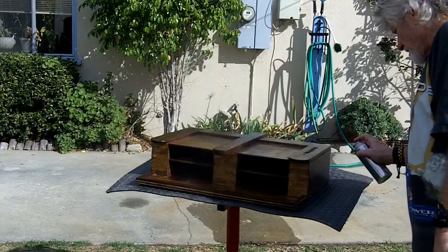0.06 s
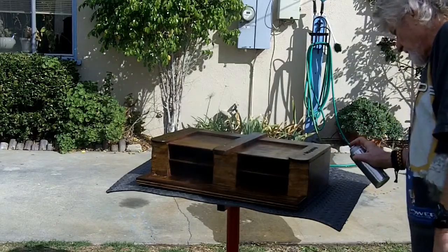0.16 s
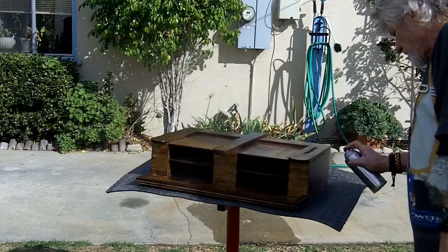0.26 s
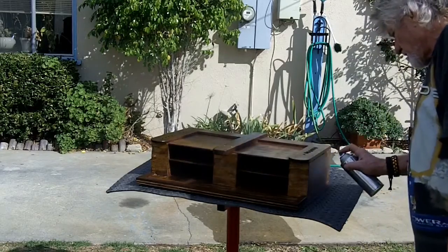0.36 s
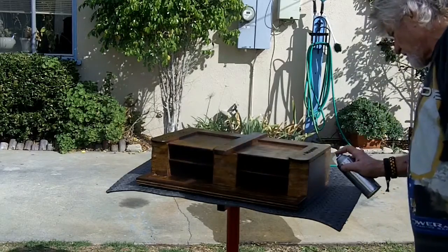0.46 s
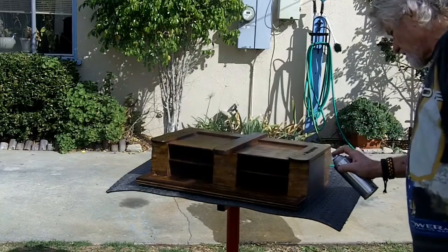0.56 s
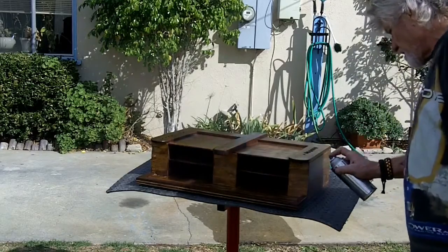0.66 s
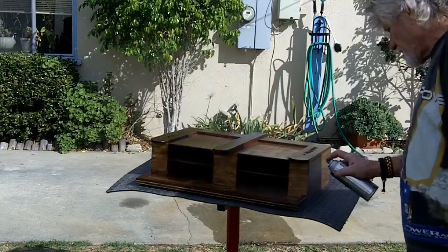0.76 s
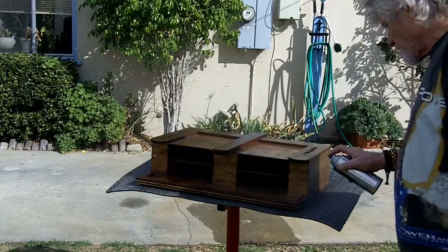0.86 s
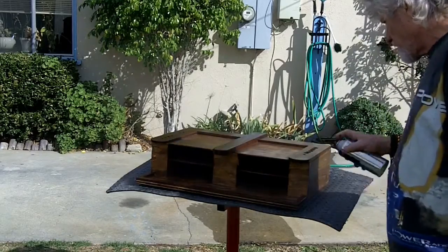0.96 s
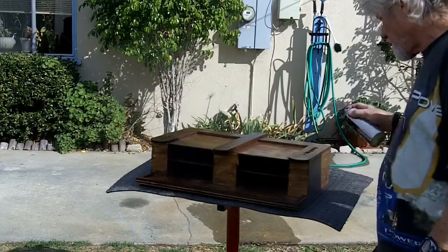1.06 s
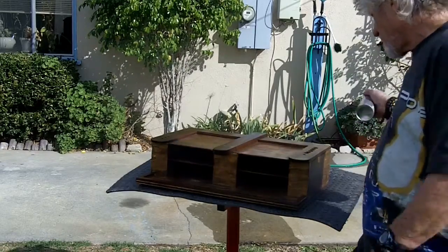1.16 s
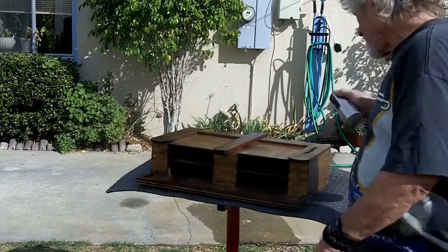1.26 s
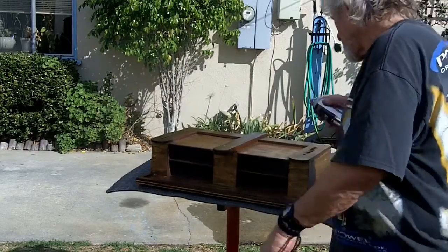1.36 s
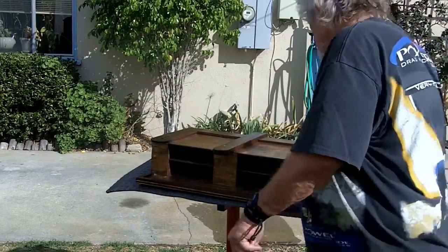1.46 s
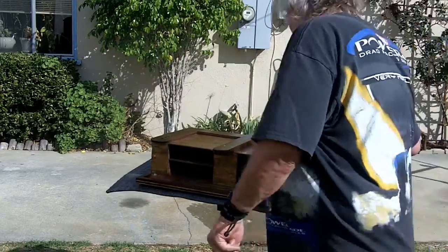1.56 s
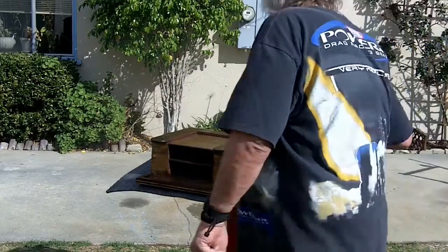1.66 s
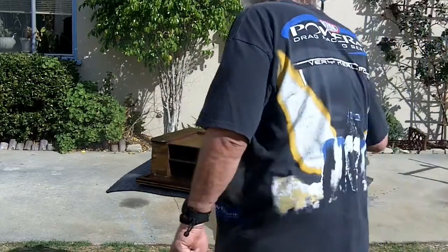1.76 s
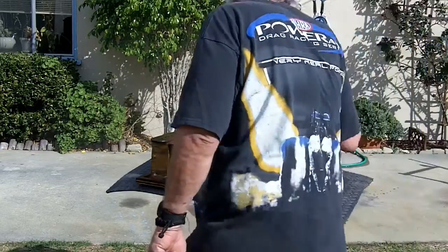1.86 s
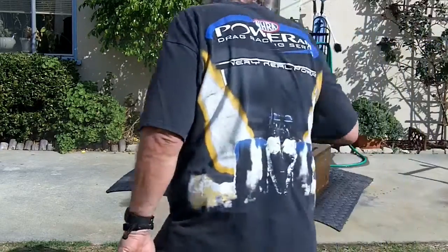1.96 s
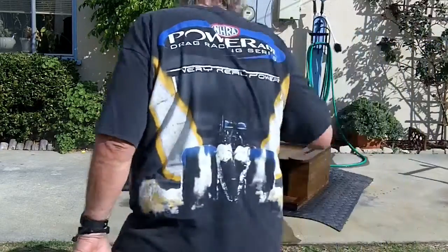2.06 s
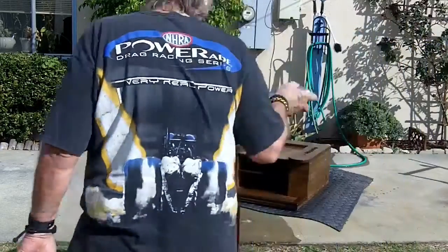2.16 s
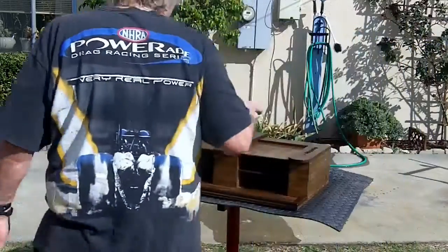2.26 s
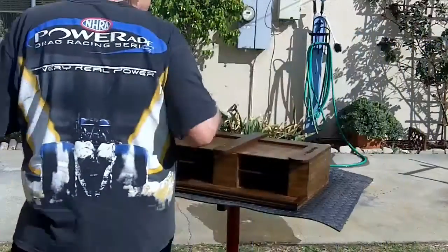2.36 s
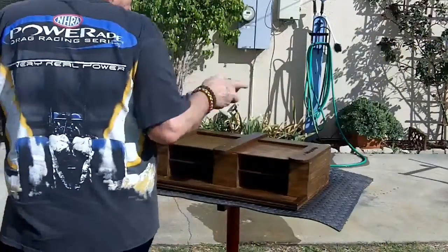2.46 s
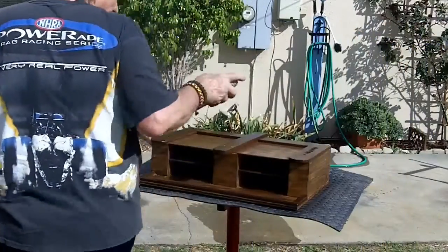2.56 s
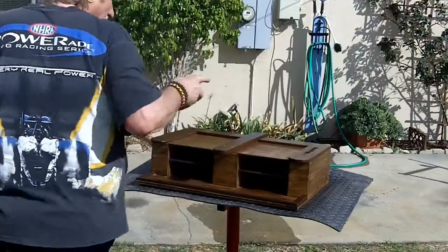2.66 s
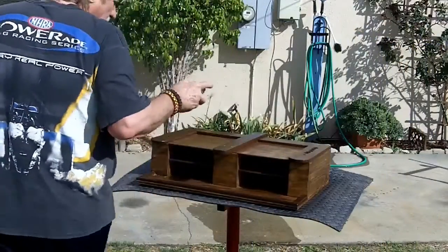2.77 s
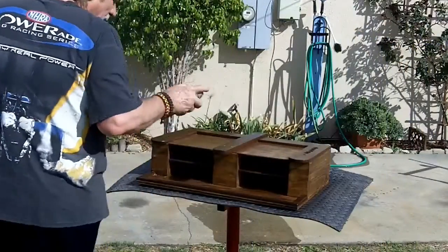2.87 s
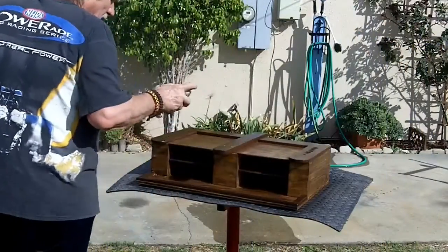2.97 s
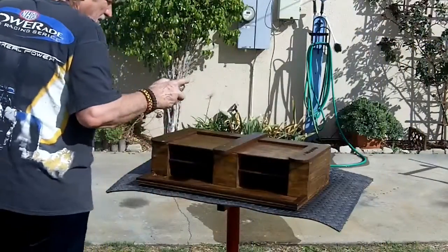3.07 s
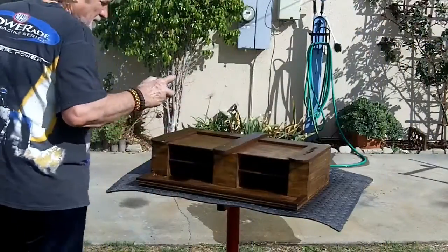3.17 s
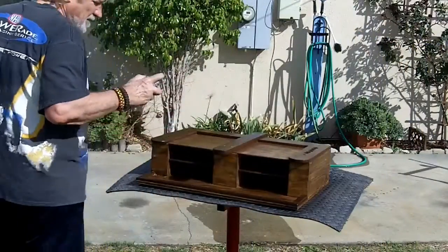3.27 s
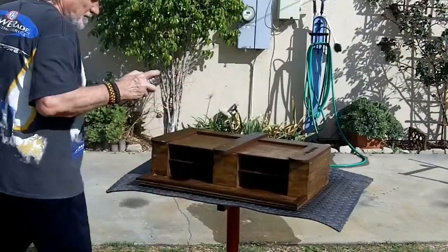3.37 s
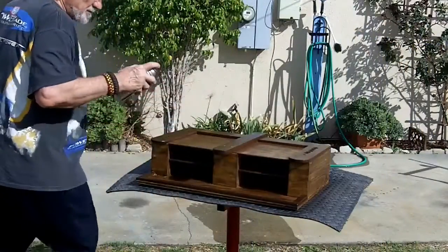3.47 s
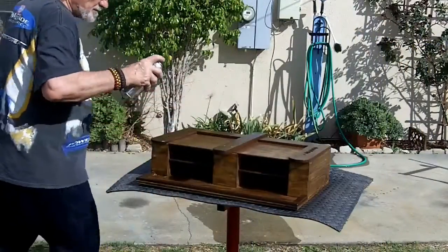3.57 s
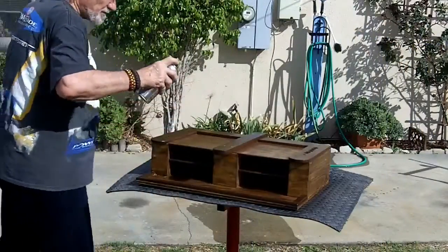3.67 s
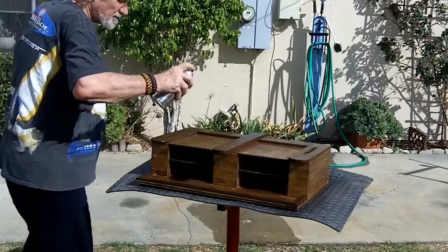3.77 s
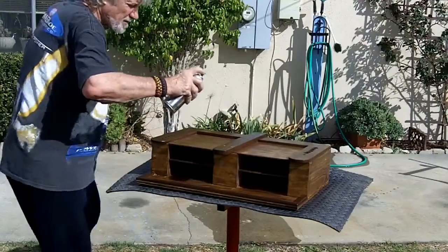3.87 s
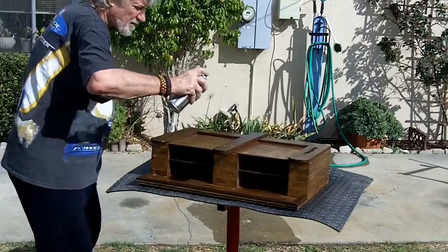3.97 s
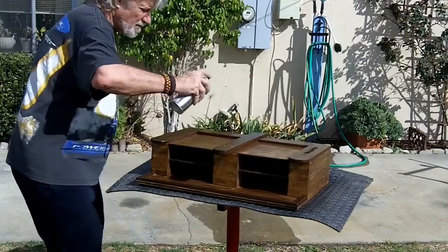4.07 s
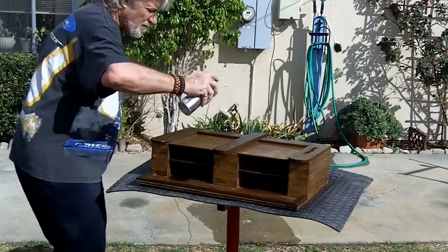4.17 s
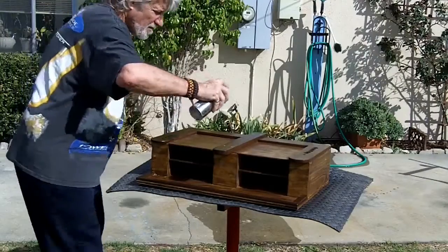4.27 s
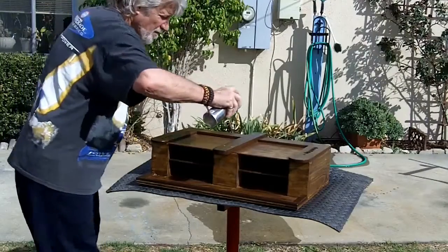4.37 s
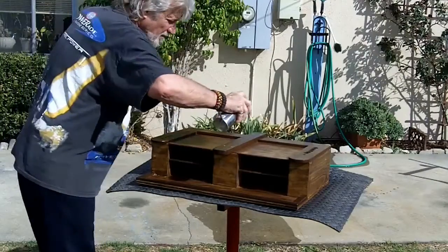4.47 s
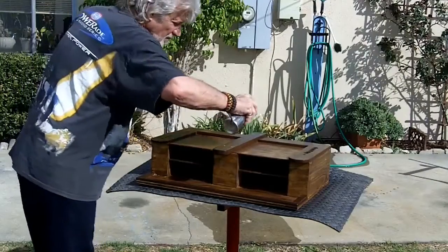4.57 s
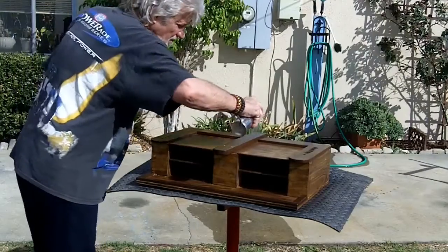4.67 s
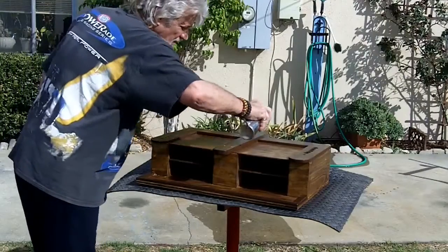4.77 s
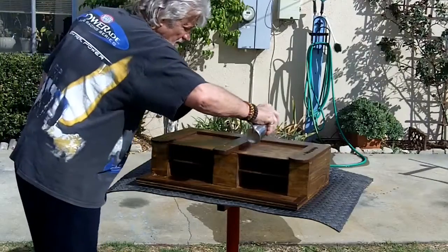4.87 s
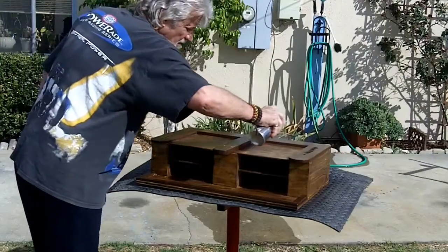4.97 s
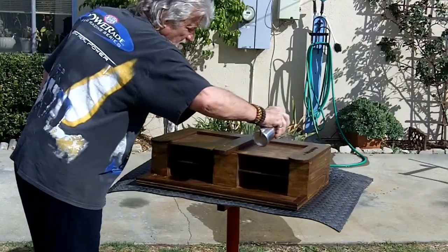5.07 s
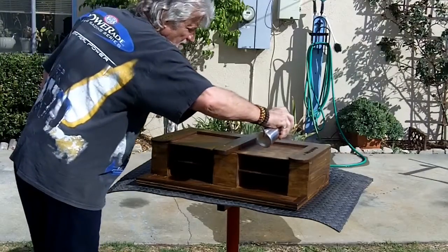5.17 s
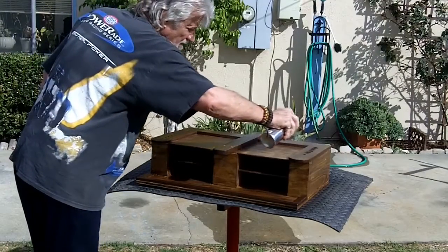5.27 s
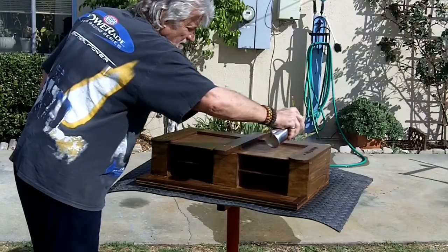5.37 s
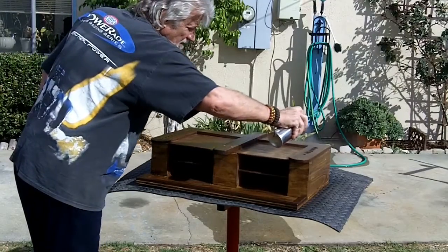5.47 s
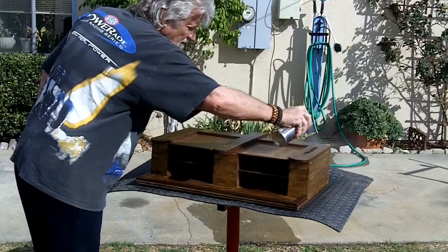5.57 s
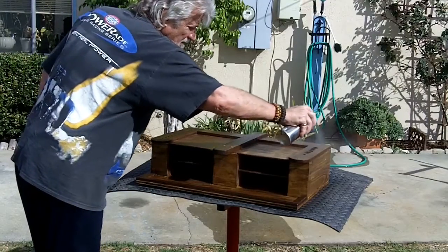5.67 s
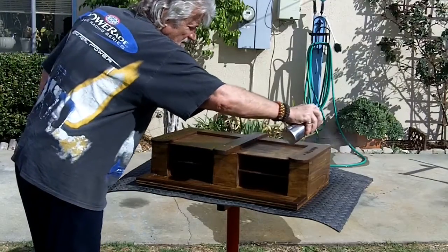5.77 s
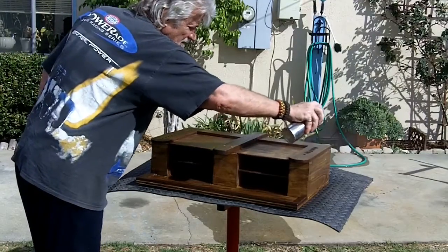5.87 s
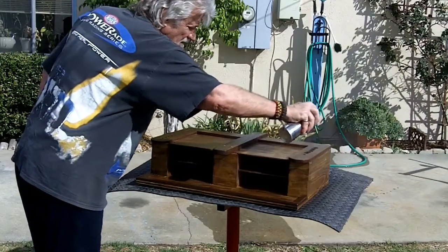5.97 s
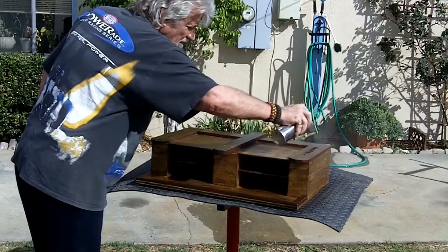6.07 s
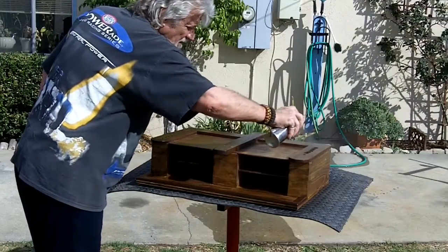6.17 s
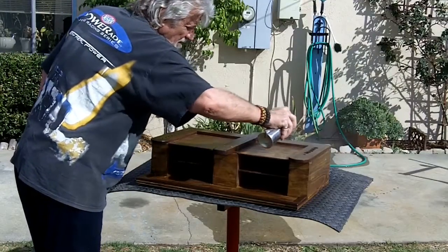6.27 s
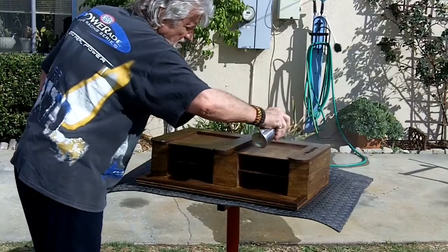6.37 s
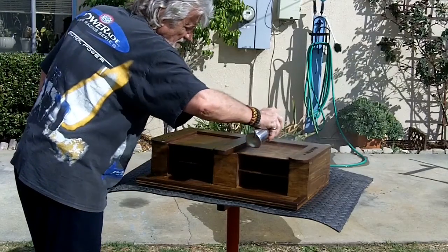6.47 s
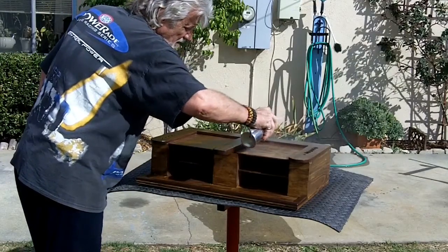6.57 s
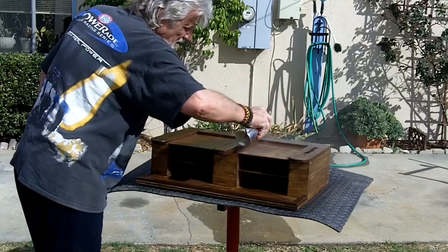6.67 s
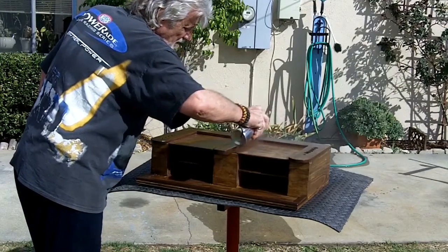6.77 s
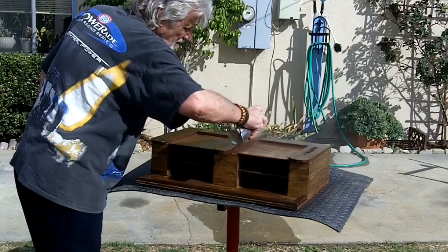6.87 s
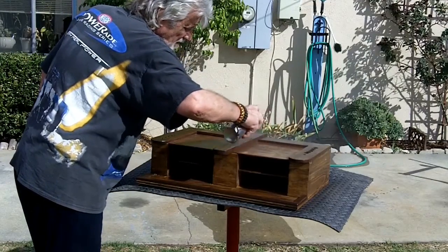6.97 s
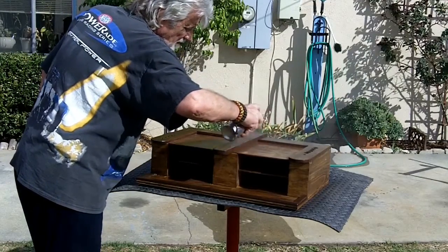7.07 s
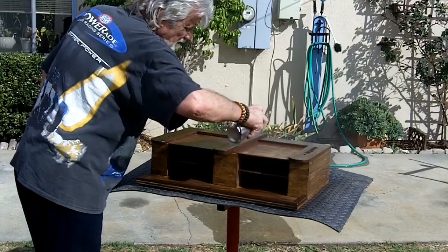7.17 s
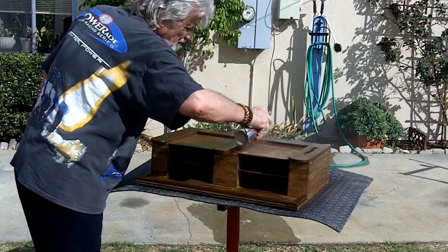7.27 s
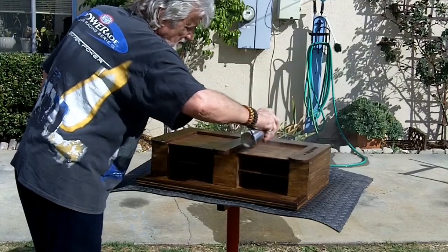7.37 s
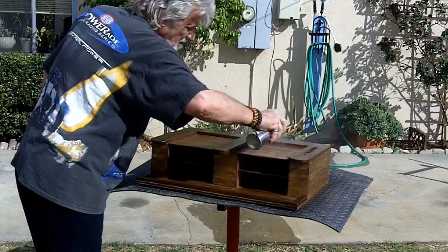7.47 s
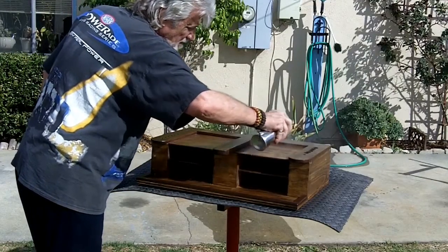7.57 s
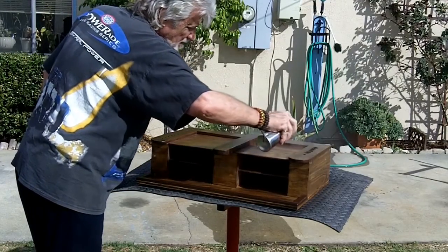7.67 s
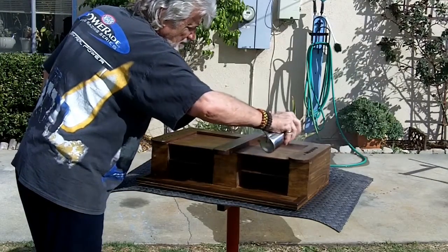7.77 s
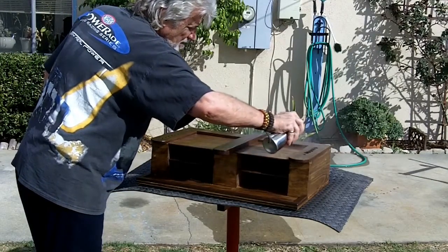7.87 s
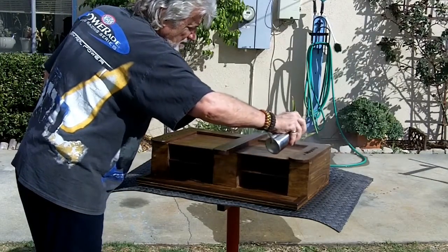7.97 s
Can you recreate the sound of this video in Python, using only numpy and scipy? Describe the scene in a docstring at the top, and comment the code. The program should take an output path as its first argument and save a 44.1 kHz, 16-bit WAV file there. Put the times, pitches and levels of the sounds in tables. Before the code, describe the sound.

An aerosol can spits and hisses softly for about a second. It is then shaken for two seconds, its metal ball knocking sharply and unevenly with a little slosh, the yard walls throwing back short echoes. Shoes scuff faintly on concrete, then three more soft sprays follow. A distant motor hums throughout over a low rumble, with a few faint bird chirps. The can is fairly near and straight ahead.

```python
"""An aerosol can hisses as a man sprays a small cabinet in a walled yard; the jet's echo off the wood
combs the hiss. He stops, shakes the can while he walks round the table, and sprays again. The mixing
ball knocks and rolls inside the can, paint sloshes, and the walls throw each knock back. Shoes scuff
on concrete and a shirt rustles. Far off, birds chirp, a motor hums, a thin whine comes and goes, and
traffic swells over a low rumble."""
import sys
import numpy as np
from scipy import signal
from scipy.fft import rfft, irfft, next_fast_len
from scipy.io import wavfile

SR = 44100
rng = np.random.default_rng(int(sys.argv[2]) if len(sys.argv) > 2 else 0)


def file_out(sig):
    """Save sig as 16-bit WAV at sys.argv[1]."""
    # one column per channel
    cols = np.atleast_2d(sig).T
    # limit, then scale
    lim = np.clip(cols, -1, 1)
    pcm = np.round(lim * 32767).astype(np.int16)
    wavfile.write(sys.argv[1], SR, pcm)


N = 353241
TIME = np.arange(N) / SR

# The can wall's first flex in its low, middle, high and top mode groups.
# Each row: nominal pitch in Hz, nominal width in Hz.
FLEX = [(2080, 280), (3750, 360), (6750, 200), (8600, 720)]
# Bright, dry tone of rasps, scuffs and rustles. Each row: frequency in Hz, relative level in dB.
GRIT_COLOUR = [(500, -15.5), (1500, -3), (3500, 1.5), (7000, 3.5), (9000, -1.5), (12000, -11.5),
               (16000, -24.5)]


def spray(spit_s=0.03, flutter_db=0.9, sputter_db=-54.0, sputter_s=0.0055, yard_db=2.5):
    """The valve sputters open and shut; the jet's echo off the cabinet combs the hiss as the hand moves."""
    # Each row: start in seconds, end in seconds, level in dB, boost of the opening spit in dB.
    presses = [(-.1,.045,-57,-8), (.135,1.005,-63,12.5), (4.835,5.965,-64.5,5), (6.185,7.22,-65,1),
               (7.4,8.1,-64,3.5)]
    # Jet tone in the open and close over the wood. Each row: frequency in Hz, relative level in dB.
    open_colour = [(500, -17), (1200, -26), (3000, -2), (4500, 0.5), (7000, -1.5), (9000, -7),
                   (11000, -11.5), (15000, -16), (15500, -48)]
    close_colour = [(500, -17), (1200, -12), (3000, 1.5), (7000, 5), (8600, 5.5), (9700, -7.5),
                    (11000, -8.5), (15000, -14), (15500, -45)]
    # Share of the jet that the cabinet throws back: in the open, then close over the wood.
    echo_shares = [.38, .42]
    # Height of the can over the wood. Each row: time in seconds, lag of the echo in milliseconds.
    echo_lags = [(.45,0.35), (.75,0.52), (4.84,0.8), (5.03,0.61), (5.96,0.87), (6.19,.83), (7.22,0.96),
                 (7.4,0.98), (8,1.26)]
    jets = [noise(open_colour), noise(close_colour)]
    caught = 1 + .4 * drift(6)   # the uneven wood returns more or less
    lag_s = (1 + .01 * drift(7)) * curve(echo_lags) / 1000
    hiss, sputter = np.zeros((2, N))
    for press, (start, end, db, spit_db) in enumerate(presses):
        is_close = press >= 2
        jet = jets[is_close]
        valve = np.clip((TIME - start) / 0.0081, 0, 1) * np.clip((end - TIME) / 0.0074, 0, 1)
        spit = spit_db * np.exp(-np.minimum(abs(TIME - start) / spit_s, 20))
        echo = echo_shares[is_close] * caught * np.interp(TIME - lag_s, TIME, jet)
        hiss += valve * from_db(db + spit) * (jet + echo)
        for s in (start + sputter_s, end - sputter_s):
            sputter += np.clip(1 - abs(TIME - s) / (2 * sputter_s), 0, 1)
    out = hiss * from_db(flutter_db * drift(60)) + swishes()
    sputter_colour = [(1000, -21), (4000, -9.5), (5000, -5), (6400, -1), (7500, -6.5), (14000, -36)]
    out += from_db(sputter_db) * sputter * noise(sputter_colour)
    return out + from_db(yard_db) * yard(out)


def swishes():
    """An edge in the jet gives a brief band of hiss."""
    # Each row: centre and half length in seconds, level in dB, low and high band edges in Hz.
    crossings = [(0.603,.07,-72,8400,8900), (.82,0.087,-75,7700,8300), (5.07,0.042,-59,6700,8800),
                 (5.37,.04,-66,6200,7100), (7.15,.03,-66.5,6500,7460), (7.205,0.0087,-65,5870,6560)]
    air = rng.standard_normal(N)
    return sum(from_db(db) * bell(s, half) * rms_one(band(air, low, high))
               for s, half, db, low, high in crossings)


def rattle(level_db=-14.0, echo_shift=.06):
    """The ball knocks on the can; near echoes shift as the can moves, and the walls get a broader clack."""
    # Each row: time in seconds, relative level of the low note in dB, hardness in dB, extra middle from
    # landing on a domed end in dB, low note in Hz, middle ping in Hz, sustain factor of both, bite in dB.
    strokes = [(1.4119,-25,5.5,-3.5,2270,4026,0.95,-21), (1.499,-30,-13,1,1960,3210,1.8,-2),
               (1.504,-36,2.5,-3,2000,3280,1.1,-6), (1.514,-34.5,-1.5,2,2000,2980,1.2,5),
               (1.5256,-30.5,-17,-14,1880,3315,1.6,13), (1.536,-38,-13,-11,2000,3650,0.91,13),
               (1.545,-40,-13,-9,2030,3760,1.5,15), (1.6096,-25,-4.5,-2.5,1850,3750,1.3,-2),
               (1.6634,-37.5,-13,-1,2060,3700,2.2,0), (1.7114,-37.5,-10.5,-5,1600,3600,1.5,1),
               (1.754,-31.5,-2,-5,2740,3720,0.64,-2), (1.764,-47,5,3,2390,3360,.8,5),
               (1.9246,-33,-8,-0.5,1740,4060,1.1,-6), (2.0299,-37,-24,2,1380,3000,1,3),
               (2.083,-36.5,2,4.5,2420,3740,.9,-12), (2.2536,-33,-3.5,3.5,2200,3700,1.8,-9),
               (2.314,-33,-20,5.5,2010,3200,0.88,-7), (2.3492,-29.5,-18.5,-9,2080,3270,1.4,-1),
               (2.407,-23,-6,11,2380,3910,1.2,-3), (2.424,-25.5,-4,3,2460,3360,1.6,-14),
               (2.4745,-28,-7.5,3,2350,3730,1.8,-21), (2.561,-27,-4.5,0.5,1800,3620,1.5,-15),
               (2.6785,-35.5,-16,-6,2130,3720,1.4,-3), (2.717,-38,-23,7.5,1500,3000,1,0),
               (2.8216,-36,2.5,0,2100,4100,1.1,1), (2.9584,-36.5,-21,-6,2160,3360,2.8,-7),
               (2.993,-32.5,-5.5,-1.5,2170,3760,1.3,-7), (3.0521,-27.5,-16.5,2.5,1915,3980,2.1,-16),
               (3.0877,-33,-10.5,-1.5,2110,3920,2.2,-8), (3.1314,-37,-16,-1,2220,4070,2.2,-5),
               (3.1653,-37.5,-11.5,7,2150,3750,1.1,-3), (3.2516,-39.5,-12.5,0.5,2090,3520,1.6,-7),
               (3.3794,-49,-1.5,3.5,2150,3730,1.2,0)]
    # Bounces off table and ground. Each row: delay in seconds, relative level in dB.
    near_echoes = [(.0043, -14.5), (0.0095, -25)]
    direct, echoed, sent = np.zeros((3, N))
    for s, db, hardness_db, dome_db, *tone in strokes + tumbles():
        band_dbs, ring, send_db = blow_shape(s, db, hardness_db, dome_db)
        blow = knock(band_dbs, ring, *tone, modes_db=-0.5, crack_db=-4.5)
        clack = knock(band_dbs, ring, *tone, modes_db=4.0, crack_db=2.0)
        add(direct, s, blow)
        add(sent, s, from_db(send_db) * clack)
        for delay, echo_db in near_echoes:
            lag_s = delay * (1 + echo_shift * rng.standard_normal())
            add(echoed, s + lag_s, from_db(echo_db + send_db / 2) * blow)
    return from_db(level_db) * (direct + band(echoed + 1e-18, 500, 9000) + yard(sent))


def tumbles(count=28, start_s=1.53, end_s=3.5, level_db=-47, fade_db_per_s=1.5, spread_db=2.5):
    """Between strokes the ball tumbles ever more weakly: dull, uneven touches, as rows for rattle()."""
    place, size, spot = rng.random(count), rng.standard_normal(count), rng.standard_normal(count)
    since = (np.arange(count) + place) / count * (end_s - start_s)
    levels = level_db - fade_db_per_s * since + spread_db * size
    touches = zip(start_s + since, levels, spread_db * spot, rng.uniform(1400, 2600, count))
    hardness_db, ping_hz, sustain, bite_db = -11, FLEX[1][0], 2, 0
    return [(s, db, hardness_db, dome_db, note_hz, ping_hz, sustain, bite_db)
            for s, db, dome_db, note_hz in touches]


def blow_shape(s, db, hardness_db, dome_db, ring_knee_db=-43, shorten_db=39.5, aim=0.37, aim_knee_db=-20):
    """Harder blows are brighter, louder ones ring shorter: group levels, ring factor and yard send."""
    # Middle, high and top mode groups. Each row: offset in dB, dB gained per dB of hardness.
    brightening = [(3.5, 0.74), (-0.5, 0.8), (-2, 1.65)]
    # The man's body hides the can as he passes, so more is heard by way of the walls.
    # Each row: time in seconds, send to the yard in dB.
    shielding = [(1.41, 4), (1.52, 3.5), (1.7, 7), (2.1, 12.5), (2.35, 5.5), (2.85, 7), (3.1, -3),
                 (3.45, 7)]
    middle, high, top = [db + offset + slope * hardness_db for offset, slope in brightening]
    band_dbs = [db, middle + dome_db, high, top]
    peak_db = max(band_dbs)
    ring = np.clip(np.exp((ring_knee_db - peak_db) / shorten_db), .3, 1.6)
    aimed_db = aim * (peak_db - aim_knee_db)   # part of a blow's loudness is aim, and misses the walls
    return band_dbs, ring, curve(shielding, s) - aimed_db


def knock(band_dbs, ring, note_hz, ping_hz, sustain, bite_db, modes_db, crack_db,
          mode_spread_db=4, crack_s=0.0022, snap_hz=11500):
    """One blow of the ball: a snap of contact, a quick flex of the wall, a crack and the ringing modes."""
    # Can wall, damped by hand and paint.
    # Each row: frequency in Hz, relative level in dB, seconds to fall 60 dB at a ring factor of 1.
    can_modes = [(1420, 9.5, 0.017), (1600, -4.5, 0.012), (2077, 18.5, 0.012), (2330, 7, 0.012),
                 (3230, -12, 0.033), (3430, -7, 0.087), (3830, -1.5, 0.038), (4340, 0.5, 0.023),
                 (6150, 11.5, 0.011), (7100, 8, 0.0069), (8030, -6.5, 0.026), (8400, -2, 0.00481),
                 (9450, -4.5, 0.014), (10900, -4.5, 0.014)]
    # Borders of the four mode groups in Hz, from low to high.
    edges_hz = [750, 2700, 5500, 7600, 10000]
    t = TIME[:SR // 16]
    hz, mode_db, t60 = np.transpose(can_modes)
    strength = from_db(mode_db + mode_spread_db * rng.standard_normal(len(hz)))
    strength *= rng.choice([-1, 1], len(hz))
    loaded_hz = hz * (1 + .012 * rng.standard_normal(len(hz)))   # sloshing paint shifts the modes
    loaded_hz *= np.where(hz < edges_hz[1], (note_hz / FLEX[0][0]) ** .15, 1)   # low ones lean to the note
    decay = from_db(-60 * t / (t60[:, None] * ring))
    modes = strength[:, None] * np.sin(2 * np.pi * loaded_hz[:, None] * t) * decay
    build = 1 - np.exp(-t / 0.0003)   # the ring takes a moment to spread round the can
    out = 0
    for k, (nominal_hz, width_hz) in enumerate(FLEX):
        low, high = edges_hz[k:k + 2]
        stray_hz = nominal_hz * (1 + .05 * ring * rng.standard_normal())
        flex_hz, held = ((note_hz, ping_hz)[k], sustain) if k < 2 else (stray_hz, 1)
        flex = np.exp(-np.pi * width_hz * t / (held * ring ** .5)) * np.sin(2 * np.pi * flex_hz * t)
        flex = rms_one(band(flex, low * .55, min(high * 1.4, 10000)))
        burst = rng.standard_normal(len(t)) * build * np.exp(-t / (crack_s * ring))
        crack = rms_one(band(burst, low, high))
        stirred = (hz >= low * .85) & (hz < high)   # each group also stirs the modes just under it
        group = rms_one(build * modes[stirred].sum(axis=0))
        ringing = ring * (from_db(modes_db) * group + from_db(crack_db) * crack)
        out += from_db(band_dbs[k]) * rms_one(flex + ringing)
    snap = rms_one(band(np.exp(-t / .00014) * np.cos(2 * np.pi * snap_hz * t), 7000, 14000))
    # a harder blow is a shorter contact, so the snap grows faster than the rest
    snap_db = 1.49 * np.mean(band_dbs[:2]) - 2 + bite_db
    return out + from_db(snap_db) * snap


def roll(note_hz=2150, width_hz=220, bumps_per_s=270, yard_db=2.0):
    """A rolling ball meets many tiny bumps, which keep the wall's hollow low note sounding."""
    # Each row: centre in seconds, half length in seconds, level in dB.
    rolls = [(1.539, 0.029, -43.5), (1.68, 0.021, -56), (2.954, 0.021, -44.5)]
    bumps = (rng.random(N) < bumps_per_s / SR) * rng.standard_normal(N)
    wall = signal.iirpeak(note_hz, note_hz / width_hz, fs=SR)
    note = rms_one(signal.lfilter(*wall, bumps + 1e-18))
    out = band(note, 1200, 3500) * sum(from_db(db) * bell(s, half) for s, half, db in rolls)
    return out + from_db(yard_db) * yard(out)


def slosh(attack_s=.004, decay_s=0.03):
    """At the hard strokes, paint and propellant froth briefly against the wall of the can."""
    # Each row: start in seconds, level in dB.
    splashes = [(1.416, -40.5), (1.755, -35.5), (2.085, -39.5)]
    level = np.zeros(N)
    for s, db in splashes:
        attack = np.clip((TIME - s) / attack_s, 0, 1)
        level += from_db(db) * attack * np.exp(-np.clip((TIME - s) / decay_s, 0, 30))
    return level * noise([(1500, -24), (3500, 1), (6000, -21.5), (9700, -7.5), (11500, -21.5), (15000, -38)])


def rasp_and_scuffs(level_db=5.0, grit_db=3.5):
    """Short gritty swells: a rasp with the can's first knock, and elsewhere soles and cloth sliding."""
    # Each row: centre and half length in seconds, relative level in dB, dull layer over bright in dB.
    swells = [(1.208, 0.027, -60.5, -28), (1.406, 0.031, -60.5, -12), (2.897, 0.1, -65.5, -0.5),
              (3.321, 0.025, -59.5, -2), (3.795, 0.028, -65, -1.5), (3.946, 0.013, -67, -17.5),
              (4.1, 0.016, -60.5, 4.5), (4.265, 0.028, -62, -5), (4.504, 0.034, -67, -5),
              (4.613, 0.037, -68.5, 5.5)]
    # The dull layer, which gives a footstep its heel. Each row: frequency in Hz, relative level in dB.
    dull_colour = [(150, -10), (500, 0.5), (1200, -6), (3000, -7.5), (5000, -21), (9000, -39.5)]
    bright, dull = np.zeros((2, N))
    for s, half, db, dull_db in swells:
        swell = from_db(db) * bell(s, half)
        bright += swell
        dull += from_db(dull_db) * swell
    out = bright * noise(GRIT_COLOUR) + dull * noise(dull_colour)
    out *= from_db(level_db + grit_db * drift(400))
    return out + yard(out)


def rustle(grain_db=2.5):
    """The shirt rubs softly on itself as the man moves."""
    # Each row: time in seconds, level in dB.
    movement = [(.1,-65), (1.03,-64), (1.3,-70.5), (3.45,-66.5), (3.7,-69.5), (4.75,-72.5), (6,-74),
                (6.15,-89), (7.27,-77), (7.39,-67.5), (7.6,-82)]
    return from_db(curve(movement) + grain_db * drift(120)) * noise(GRIT_COLOUR)


def yard(x, tail_db=-24.5, build_s=0.012, smear_s=.0045):
    """Rough walls return smeared echoes, then a diffuse tail that dies first in the treble."""
    # Each row: frequency in Hz, seconds for the tail to fall 60 dB.
    decay_times = [(500, 0.5), (2300, 0.42), (4000, 0.39), (8000, 0.3), (14000, 0.076)]
    # Each row: delay in seconds, level in dB.
    wall_echoes = [(0.0273, -20.5), (0.031, -27.5), (.0425, -37), (0.053, -33.5)]
    t = TIME[:SR * 3 // 4]
    response, edges_hz = np.zeros(len(t)), np.geomspace(300, 16000, 9)
    for low, high in zip(edges_hz, edges_hz[1:]):
        t60 = at_hz(decay_times, np.sqrt(low * high))
        response += band(rng.standard_normal(len(t)), low, high) * from_db(-60 * t / t60)
    response *= 1 - np.exp(-t / build_s)
    response *= from_db(tail_db) / np.linalg.norm(response)
    for delay, db in wall_echoes:
        echo = rng.standard_normal(len(t)) * np.exp(-t / smear_s)
        add(response, delay, from_db(db) * echo / np.linalg.norm(echo))
    return signal.fftconvolve(x, response)[:N]


def birds(direct_db=-3.5, yard_db=12.5, waver=.008, rasp_per_s=700, flicker_db=4):
    """Far birds sing thin glides, some whistled and some hoarse, echoed by the walls."""
    # Each row: start and length in seconds, first and last pitch in Hz, relative level in dB, rasp 0-1.
    chirps = [(0.476,0.076,2950,2820,-61,0.4), (4.14,.06,3400,3220,-64,.3),
              (4.175,0.066,2950,2750,-61.5,0.3), (4.274,0.072,2000,2138,-55,0.4),
              (4.317,0.12,3720,3740,-66,0.15), (5.532,0.1,3200,4500,-58,.85),
              (5.836,0.11,2900,3440,-56.5,.45), (5.951,0.044,3400,4080,-52.5,0.3),
              (5.929,0.0706,2650,3130,-56.5,.85), (5.984,0.045,3130,3070,-54.5,.1),
              (6.249,0.055,3300,3330,-60,.3), (6.28,0.09,2900,2490,-61,0.7), (7.475,.04,3020,2870,-61,.15)]
    out, wobble = np.zeros(N), 1 + waver * drift(300)
    flutter = (drift(rasp_per_s) + 1j * drift(rasp_per_s)) / np.sqrt(2)
    for s, length, first_hz, last_hz, db, rasp in chirps:
        size, at = int(length * SR), int(s * SR)
        hz = np.linspace(first_hz, last_hz, size) * wobble[at:at + size]
        whistle = np.exp(2j * np.pi * np.cumsum(hz) / SR)
        note = whistle * (np.sqrt(1 - rasp) + np.sqrt(rasp) * flutter[at:at + size])
        add(out, s, from_db(db) * np.hanning(size) ** .5 * note.real)
    out *= from_db(flicker_db * drift(90))
    return from_db(direct_db) * out + from_db(yard_db) * yard(out)


def motor(start_hz=93.7, sag_hz_per_s=.45, settled_hz=90.5, wander=0.005, waver_db=1.0,
          first_db=-57, second_db=-1.0, third_db=-24.5, roar_db=-6.5):
    """A distant motor hums two strong harmonics and a weak third; a soft roar swells with them."""
    # Swell of the upper harmonics and the roar. Each row: time in seconds, base level in dB.
    hum_levels = [(0.0, -54), (0.53, -61), (0.58, -69), (0.89, -51.5), (1.63, -46), (4.1, -58.5),
                  (4.34, -66), (5.32, -59.5), (5.37, -75), (5.84, -55), (7.31, -63), (7.82, -55),
                  (7.98, -70.5)]
    swell_db = curve(hum_levels)
    swell = from_db(swell_db)
    fundamental = from_db(first_db + 0.4 * (swell_db - swell_db.mean()))   # swings less than the rest
    fundamental += from_db(-50) * bell(s=5.4, half_s=0.062)   # and booms once
    hz = np.maximum(start_hz - sag_hz_per_s * TIME, settled_hz)
    phase = 2 * np.pi * np.cumsum(hz * (1 + wander * drift(8))) / SR
    gains = [fundamental, swell * from_db(second_db), swell * from_db(third_db)]
    tones = sum(np.sqrt(2) * gain * from_db(waver_db * drift(13)) * np.sin(harmonic * phase)
                for harmonic, gain in enumerate(gains, 1))
    roar = noise([(80, -3.5), (200, 5.5), (330, -3), (410, -5), (500, -2.5), (700, -15.5), (2000, -40)])
    return tones + from_db(roar_db) * swell * roar


def whine(hz=489, half_s=0.13, waver=0.0047):
    """A faint, wavering tone swells twice in the distance."""
    # Each row: centre in seconds, level in dB.
    swells = [(5.62, -65), (7.35, -68.5)]
    phase = 2 * np.pi * np.cumsum(hz * (1 + waver * drift(10))) / SR
    return np.sqrt(2) * np.sin(phase) * sum(from_db(db) * bell(s, half_s) for s, db in swells)


def traffic(bed_db=-71.5, half_s=0.21):
    """Tyre noise swells and fades far off; nearer passes bring the whirr of the tread."""
    # Each row: centre in seconds, level of the roar in dB, whirr over roar in dB.
    passes = [(0.05, -72, -20), (.95, -67.5, -13.5), (6.55, -79, -10.5), (7.85, -71, 2)]
    # Each row: frequency in Hz, relative level in dB.
    tread_colour = [(550, -20), (850, 0), (1250, -11), (1480, -2), (2000, -27.5)]
    roar_colour = [(250, -17), (480, -3), (800, -1.5), (1300, -11.5), (2200, -17.5), (5000, -45.5)]
    roar = from_db(bed_db) + sum(from_db(db) * bell(s, half_s) for s, db, _ in passes)
    whirr = sum(from_db(db + tread_db) * bell(s, half_s) for s, db, tread_db in passes)
    return roar * noise(roar_colour) + whirr * noise(tread_colour)


def outdoors(rumble_db=-41, hiss_db=-66, side_rumble_db=-69.5, side_hiss_db=-84):
    """Low rumble of the neighbourhood and a faint hiss, nearly alike on both sides."""
    # Each row of these four colours: frequency in Hz, relative level in dB.
    rumble_colour = [(15, 0), (22, -0.5), (45, -3), (69, -18.5), (97, -19.5), (182, -25.5), (209, -27),
                     (374, -29), (415, -34.5), (487, -31), (1000, -45.5), (1300, -66), (2200, -120)]
    hiss_colour = [(500, -11.5), (900, -0.5), (1500, -3.5), (3000, -7), (6000, -15), (9000, -18.5),
                   (14800, -24), (15500, -48.5)]
    side_rumble = [(15, 1), (50, 8), (100, -3.5), (400, -13), (1000, -22.5), (2200, -52)]
    side_hiss = [(100, -22), (500, -9.5), (1500, -1), (5000, -27), (12000, -1), (16000, -24.5)]
    mid = from_db(rumble_db) * noise(rumble_colour) + from_db(hiss_db) * noise(hiss_colour)
    side = from_db(side_rumble_db) * noise(side_rumble) + from_db(side_hiss_db) * noise(side_hiss)
    return mid + np.array([side, -side])


def from_db(db):
    """Decibels to gain."""
    return 10 ** (np.asarray(db) / 20)


def rms_one(x):
    """Scale to rms 1."""
    return x / np.sqrt(np.mean(x ** 2) + 1e-20)


def curve(points, s=TIME):
    """Read (seconds, value) rows along straight lines."""
    return np.interp(s, *np.transpose(points))


def at_hz(points, hz):
    """Read (Hz, value) rows on a log-frequency axis."""
    f, value = np.transpose(points)
    return np.interp(np.log(np.maximum(hz, 1)), np.log(f), value)


def noise(colour):
    """Noise at rms 1, its spectrum shaped by (Hz, dB) rows."""
    size = next_fast_len(N)
    hz = np.arange(size // 2 + 1) * SR / size
    spectrum = rfft(rng.standard_normal(size)) * from_db(at_hz(colour, hz)) * (hz > 10)
    return rms_one(irfft(spectrum, size)[:N])


def drift(per_s):
    """A random wander at rms 1, with so many turning points a second."""
    knots = rng.standard_normal(size=8000)
    return rms_one(np.interp(TIME * per_s, np.arange(len(knots)), knots))


def bell(s, half_s):
    """A smooth swell of height 1 around a time."""
    return np.exp(-np.minimum(((TIME - s) / half_s) ** 2 / 2, 20))


def band(x, low, high):
    """Band-pass between two edges in Hz."""
    return signal.sosfilt(signal.butter(3, [low, high], "band", fs=SR, output="sos"), x)


def add(out, s, sound):
    """Mix a sound in at a time."""
    at = int(np.clip(round(s * SR), 0, len(out) - 1))
    out[at:at + len(sound)] += sound[:len(out) - at]


def scene(width_db=-26, off_axis_db=-40.0):
    """All is nearly straight ahead: knocks reach one side a hair earlier, and the yard adds some width."""
    knocks = rattle()
    near = knocks + roll() + slosh() + spray() + rasp_and_scuffs() + rustle()
    side = from_db(width_db) * yard(near) + from_db(off_axis_db) * np.gradient(knocks)
    return near + np.array([side, -side]) + birds() + motor() + whine() + traffic() + outdoors()


def record(dry, notch_hz=5480, notch_width_hz=1300, notch_depth=0.94, cutoff_hz=16000):
    """Notch the treble, cut the very top and add a small steady offset, mostly on the right."""
    notched = signal.lfilter(*signal.iirnotch(notch_hz, notch_hz / notch_width_hz, fs=SR), dry)
    coloured = dry + notch_depth * (notched - dry)
    cut = signal.sosfilt(signal.ellip(10, .2, 90, cutoff_hz, fs=SR, output="sos"), coloured)
    return cut + np.array([[0.0049], [0.023]])


dry = scene()
out = record(dry)
file_out(out)
```